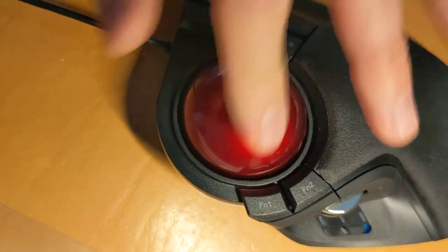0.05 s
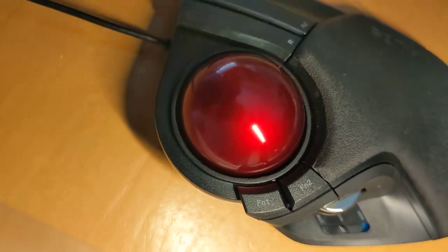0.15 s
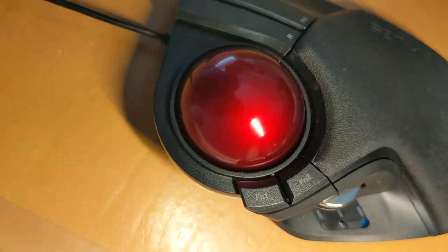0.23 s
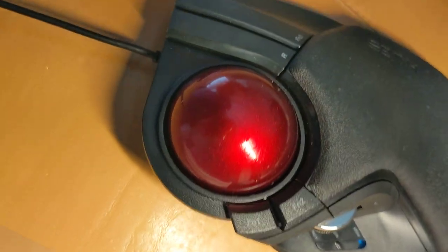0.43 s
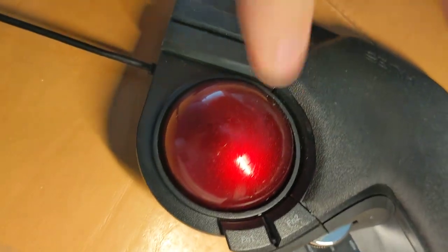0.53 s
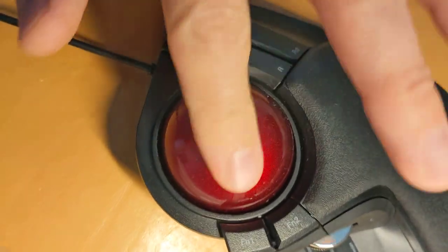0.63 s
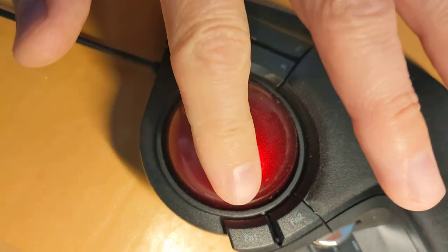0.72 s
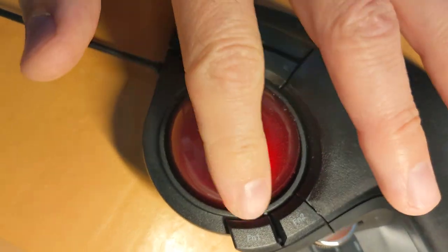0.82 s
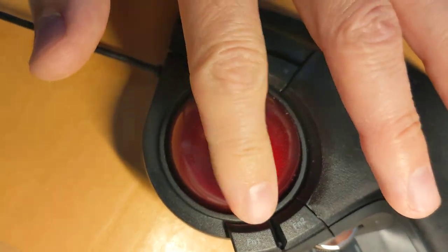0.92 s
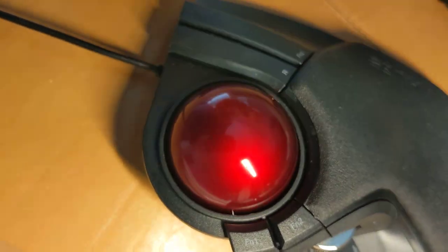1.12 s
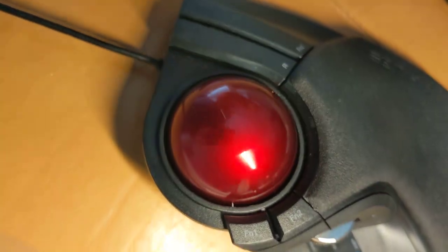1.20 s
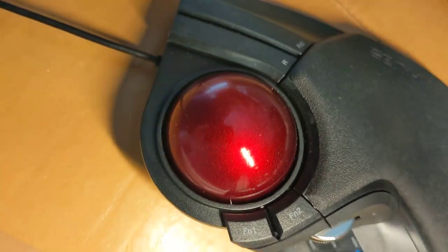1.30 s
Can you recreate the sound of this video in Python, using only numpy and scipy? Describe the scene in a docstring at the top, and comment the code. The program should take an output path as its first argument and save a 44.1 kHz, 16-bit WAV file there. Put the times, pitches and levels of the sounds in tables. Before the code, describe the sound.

A finger flicks a trackball twice on a desk, heard up close in a small room. The first flick brings a sharp clack and a faint fading whirr; the second gives a soft hiss with light knocks.

```python
"""Two flicks of a trackball

Close by on a desk in a small room, a finger flicks the ball twice. Each stroke hisses and drags the ball
over its bearings. The first opens with a small pop; then the ball drops back into its cup with a sharp
double clack and spins down with a thin whirr. The second only knocks softly. Faint air and hum lie below."""
import sys
import numpy as np
from scipy import signal
from scipy.fft import rfft, irfft
from scipy.io import wavfile

SR = 44100
rng = np.random.default_rng(int(sys.argv[2]) if len(sys.argv) > 2 else 0)


def output_pcm(signal):
    """Save a mono or channel-first signal as 16-bit PCM at the path in sys.argv[1].

    Samples are clipped to [-1, 1] before scaling.
    """
    pcm = np.clip(np.atleast_2d(signal).T, -1, 1) * 32767
    wavfile.write(sys.argv[1], SR, np.round(pcm).astype(np.int16))


N = 59535
TIME = np.arange(N) / SR
FREQS = np.fft.rfftfreq(N, 1 / SR)

# ball hitting its bearings: t/s, crack/dB, shell/dB, shell centre/Hz, shell spread/octaves, desk/dB
CONTACTS = [(0.1682, -40, -53.5, 1900, 1.0, -70), (0.1887, -36.5, -43, 1900, 1.0, -69),
            (0.2042, -10.5, -25, 1900, .8, -72.5), (.2070, -11.5, -27.5, 1613, 0.67, -72.5),
            (0.2107, -9.5, -46, 1900, 1.0, -69.5), (0.2117, -11, -11.5, 1160, 1.19, -52.5),
            (0.93, -75, -51.5, 1240, .15, -85), (1.1234, -47, -35, 1550, 1.43, -53.5),
            (1.1738, -44, -24, 2258, 0.11, -76)]


def knocks(rise_s=.00025, left_lag_s=.00026):
    """Each contact cracks brightly and rings bearings and shell; the sound reaches the right side first."""
    # spectrum of the hard contact: f/Hz, level/dB
    crack_colour = [(60, -45.5), (300, -25), (1000, -21), (2200, -11.5), (3100, -24), (4600, -15.5),
                    (5600, -14), (7000, -9.5), (8500, -7.5), (10000, -12), (11500, -6), (13300, -2),
                    (15500, -3), (16500, -14.5)]
    # hard ring of ball and bearings: f/Hz, level/dB, t60/s
    bearing_modes = [(3860, -38, 0.08), (5266, -28.5, .05), (7190, -23.5, .025), (11500, -17.5, 0.049),
                     (12650, -23.5, 0.0453), (13090, -17.5, 0.023), (15470, -19, 0.058)]
    # plastic shell: f/Hz, level/dB, t60/s
    shell_modes = [(380, -28.5, 0.13), (573, -22, 0.094), (713, -16.5, 0.037), (803, -4.5, 0.03),
                   (853.7, -0.5, 0.036), (947, -10, 0.058), (1060, -11.5, 0.053), (1270, -9.5, .045),
                   (1628, -7.5, .05), (1920, -5.5, 0.034), (2086, -6, .025), (2455, -8, 0.019)]
    # the trackball's place in the stereo image: f/Hz, left minus right/dB
    balance = [(100, -1), (400, 3), (800, 0), (1300, 3), (2200, 10), (4400, -3), (8000, -1), (11500, -1.5),
               (14000, -6.5), (16000, -5)]
    out = np.zeros((2, N))
    for start, crack_db, shell_db, centre_hz, spread, _ in CONTACTS:
        t = since(start)
        burst = np.minimum(t / rise_s, 1) * (fade(t, t60=.014) + amp(-19) * fade(t, t60=.06))
        out += amp(crack_db) * burst * narrow(noise(crack_colour), correlation=.49)
        for hz, db, t60 in bearing_modes:
            out += amp(crack_db + db) * ring(t, hz, t60, rise_s)
        for hz, db, t60 in shell_modes:
            share = np.exp(-.5 * (np.log2(hz / centre_hz) / spread) ** 2)
            out += amp(shell_db + db) * share * ring(t, hz, t60, rise_s=1.6 / hz)
    lag = np.exp(-2j * np.pi * FREQS * np.array([[left_lag_s], [0]]))
    return irfft(rfft(out) * pan(read(balance, FREQS)) * lag, N)


def strokes(grain_db=2):
    """Skin slides on the ball and drags it round: grainy hiss over a low rumble."""
    # finger strokes, one envelope each: t/s, hiss/dB, rumble/dB
    envelopes = [
        [(.12, -67, -75), (.16, -54.5, -62), (.18, -53, -51), (.203, -36, -47.5), (.215, -79, -76)],
        [(1.05, -70, -77.5), (1.10, -54.5, -59.5), (1.128, -48.5, -47), (1.16, -47, -57), (1.205, -52.5, -60),
         (1.24, -55.5, -68), (1.295, -53, -65), (1.35, -63, -78.5)],
    ]
    # skin sliding on the ball: f/Hz, level/dB
    hiss_colour = [(100, -35), (500, -21), (1500, -13.5), (2300, -5.5), (3400, -10.5), (4800, -2),
                   (7500, -2.5), (10000, -5.5), (12500, 0), (14200, 4), (15500, 2), (16500, -5)]
    # ball dragged in its cup: f/Hz, level/dB
    rumble_colour = [(25, -26.5), (60, -9.5), (120, -4.5), (168, 11), (260, -7), (370, -0.5), (440, -12.5),
                     (550, 5.5), (640, -2), (740, -8.5), (950, 5), (1150, -8.5), (1450, -17), (2100, -2.5),
                     (3200, -20.5), (8000, -38.5)]
    out = np.zeros((2, N))
    for envelope in envelopes:
        times, hiss_db, rumble_db = np.transpose(envelope)
        grain = unit(amp(grain_db * wander(rate_hz=350)))
        hiss = level(times, hiss_db) * noise(hiss_colour)
        rumble = level(times, rumble_db) * noise(rumble_colour)
        out += grain * (hiss + rumble)
    return out * pan(db=-1.5)


def spin(width_hz=160):
    """The coasting ball excites one resonance of its bearings, which sinks as it slows."""
    # free spin: t/s, level/dB, resonance/Hz
    coast = [(.13, -69, 2000), (.25, -74, 2010), (.40, -62, 1980), (.56, -68.5, 1945), (.65, -75, 1920),
             (0.779, -90.5, 1890)]
    times, db, hz = np.transpose(coast)
    carrier = np.exp(1j * phase(np.interp(TIME, times, hz)))
    pole = np.exp(-np.pi * width_hz / SR)
    # shift down, low-pass, shift back: a noise band that follows the pitch
    band = signal.lfilter([1], [1, -2 * pole, pole ** 2], rng.standard_normal((2, N)) / carrier)
    whirr = unit((band * carrier).real)
    return whirr * level(times, db) * pan(db=1.5)


def pop(start_s=.1087, drop_hz=5870, end_hz=111, fall_s=.00105, peak_s=.0012, tail_s=.031):
    """A small wide pop with a crisp edge, whose pitch drops at once into a low blip."""
    # tone of the pop: f/Hz, gain/dB
    pop_colour = [(120, 1.5), (300, -2.5), (580, 0.5), (880, -7.5), (1200, 4.5), (1800, 4.5), (2700, -13),
                  (4000, -5), (8000, -1.5), (15000, -10)]
    t = since(start_s)
    hz = end_hz + drop_hz / (1 + t / fall_s) ** 2
    chirp = np.sin(phase(hz * (t > 0)) + np.array([[0], [1.94]]))  # the phase offset widens it
    head = amp(-35.5) * t / peak_s * np.exp(1 - t / peak_s)
    tail = amp(-47) * np.sin(np.pi * np.minimum(t / tail_s, 1)) ** 1.2
    edge = amp(-41) * (t > 0) * fade(t, t60=.0048) * rng.standard_normal((2, N))
    return colour((head + tail) * chirp + edge, pop_colour) * pan(db=-2)


def desk():
    """The knocks set the desk top booming faintly."""
    # desk top: f/Hz, level/dB, t60/s
    desk_modes = [(62.7, -8, 0.93), (131, -4, 0.66), (169.5, 1, 0.62)]
    boom = np.zeros(N)
    for start, *_, desk_db in CONTACTS:
        for hz, db, t60 in desk_modes:
            boom += amp(desk_db + db) * ring(since(start), hz, t60, rise_s=.004)
    return boom * pan(db=-2)


def room(x, predelay_s=.004):
    """Early reflections off the desk, then a tail that dies band by band."""
    # reverb decay: f/Hz, t60/s
    decay_times = [(150, 1.5), (800, 0.35), (2000, 0.49), (6000, 0.51), (15000, 0.46)]
    # reverb tone: f/Hz, gain/dB
    reverb_colour = [(100, -12), (380, -4), (600, -5.5), (780, -11), (930, -3.5), (1200, -9.5),
                     (1500, -14.5), (2200, -9.5), (5000, -8.5), (9000, -14.5), (15000, -17)]
    hz, t, bands = signal.stft(rng.choice([-1., 1.], (2, N)), SR, nperseg=256)
    early = amp(.5) * fade(t, t60=.08)
    late = fade(t, read(decay_times, hz)[:, None])
    response = signal.istft(bands * (early + late), SR, nperseg=256)[1][:, :N]
    response = colour(response / np.linalg.norm(response[0]), reverb_colour) * (TIME > predelay_s)
    return signal.fftconvolve(x, response[:, :N // 2], axes=1)[:, :N]


def room_tone(air_db=-67.5, waver_hz=7):
    """Still room air with a wavering hum and electrical whine."""
    # quiet room: f/Hz, level/dB
    air_colour = [(15, -21.5), (35, -11.5), (58, 0), (85, -8), (120, -2), (170, -0.5), (205, -9),
                  (245, -1.5), (305, -14), (370, -7), (435, -18), (505, -4.5), (660, -16.5), (1100, -15.5),
                  (1500, -17), (3000, -19), (4600, -17), (7000, -19.5), (10500, -28), (12800, -16.5),
                  (15800, -18.5)]
    # how alike the air is on both sides: f/Hz, correlation
    air_correlation = [(50, 0.47), (200, 0.97), (600, .3), (2000, 0.043), (15000, .05)]
    # hum and whine: f/Hz, rms level/dB
    tones = [(119, -81.5), (164, -78), (4500, -86.5), (13491, -86.5)]
    air = irfft(narrow(rfft(noise(air_colour)), read(air_correlation, FREQS)), N)
    hum = np.zeros(N)
    for hz, db in tones:
        hum += amp(db) * np.sqrt(2) * np.sin(phase(hz + waver_hz * wander(rate_hz=21)))
    return amp(air_db) * air + hum


def amp(db):
    """Decibels to gain."""
    return 10 ** (np.asarray(db) / 20)


def unit(x):
    """Scales to rms 1."""
    return x / np.sqrt(np.mean(x ** 2) + 1e-20)


def read(points, hz):
    """Reads a table on a log-frequency axis."""
    f, value = np.transpose(points)
    return np.interp(np.log(hz + 1), np.log(f + 1), value)


def colour(x, points):
    """Applies an EQ curve in dB."""
    return irfft(rfft(x) * amp(read(points, FREQS)), N)


def noise(points):
    """Two unrelated channels of coloured noise at rms 1."""
    return unit(colour(rng.standard_normal((2, N)), points))


def narrow(pair, correlation):
    """Narrows two unrelated channels by blending the left into the right."""
    left, other = pair
    return np.array([left, correlation * left + np.sqrt(1 - correlation ** 2) * other])


def wander(rate_hz):
    """Smooth random drift of rms 1."""
    return unit(irfft(rfft(rng.standard_normal(N)) * np.exp(-(FREQS / rate_hz) ** 2), N))


def pan(db):
    """Left and right gains for a level difference; positive leans left."""
    return amp(np.array([[.5], [-.5]]) * db)


def level(times, db):
    """Gain along an envelope, silent outside it."""
    return amp(np.interp(TIME, times, db, left=-200, right=-200))


def since(start):
    """Seconds since start, zero before."""
    return np.maximum(TIME - start, 0)


def fade(t, t60):
    """Exponential decay, 60 dB down after t60 seconds."""
    return np.exp(-np.log(1000) * t / t60)


def phase(hz):
    """Running phase of a moving pitch, in radians."""
    return 2 * np.pi * np.cumsum(hz) / SR


def ring(t, hz, t60, rise_s):
    """One mode that builds up and dies away."""
    return np.sin(2 * np.pi * hz * t) * (1 - np.exp(-(t / rise_s) ** 1.7)) * fade(t, t60)


def scene():
    """The trackball and its reverb, with desk boom, pop and room tone mixed in dry."""
    ball = knocks() + strokes() + spin()
    return ball + room(ball) + desk() + pop() + room_tone()


def record(dry):
    """Clips at full scale and cuts the very top of the treble."""
    lowpass = signal.firwin(255, cutoff=16450, window=("kaiser", 7), fs=SR)
    return signal.oaconvolve(np.clip(dry, -1, 1), lowpass[None], "same")


dry = scene()
out = record(dry)
output_pcm(out)
```